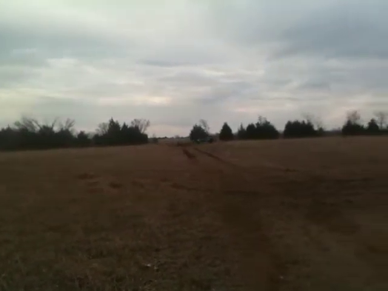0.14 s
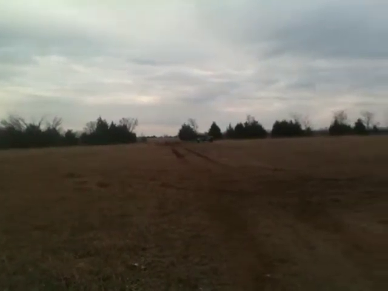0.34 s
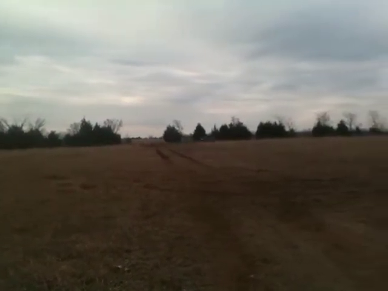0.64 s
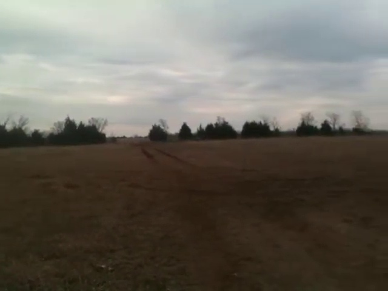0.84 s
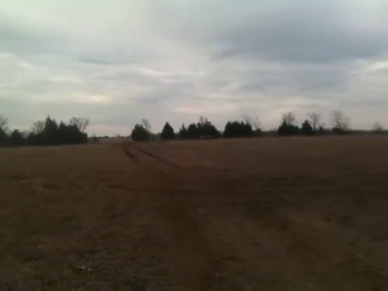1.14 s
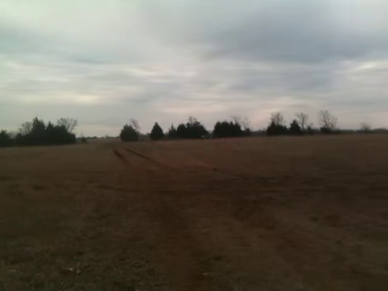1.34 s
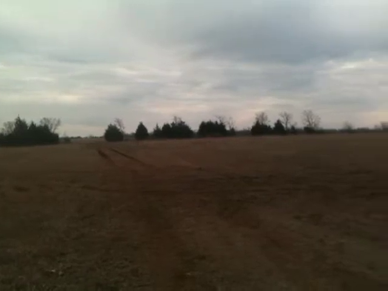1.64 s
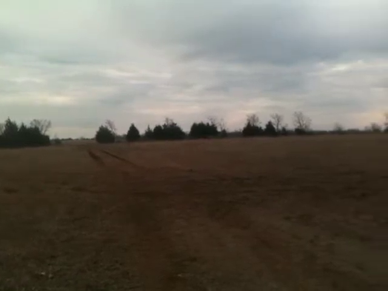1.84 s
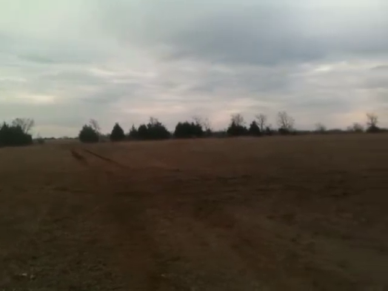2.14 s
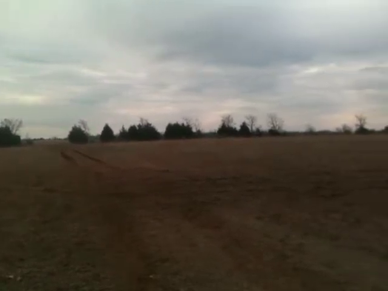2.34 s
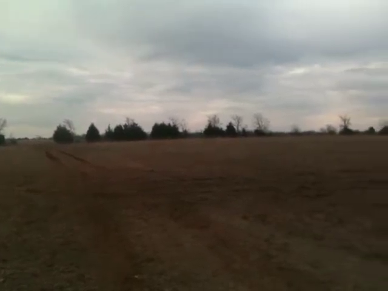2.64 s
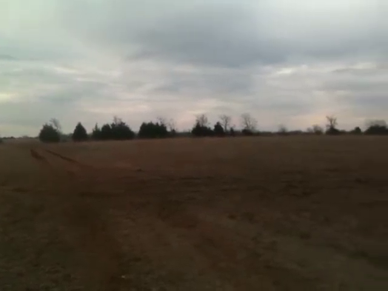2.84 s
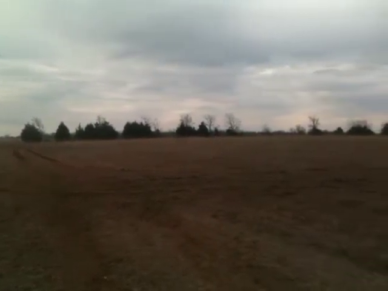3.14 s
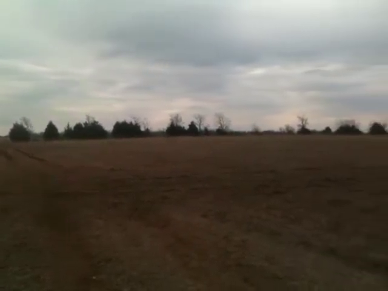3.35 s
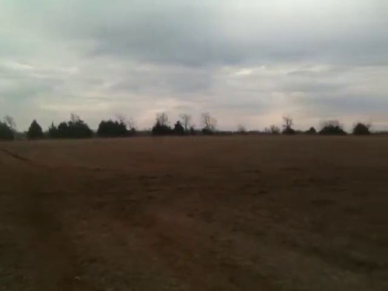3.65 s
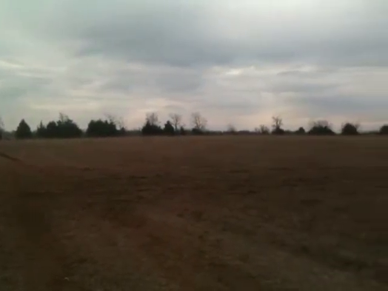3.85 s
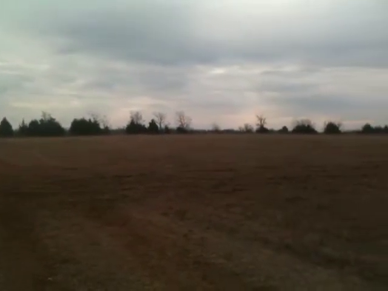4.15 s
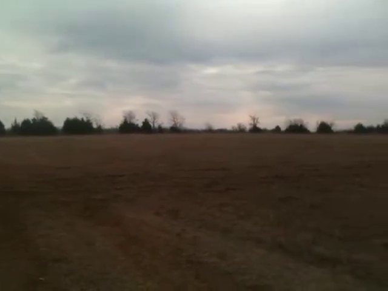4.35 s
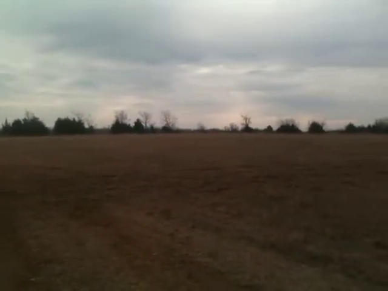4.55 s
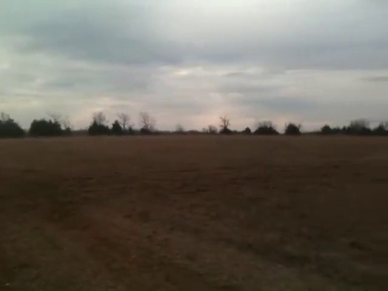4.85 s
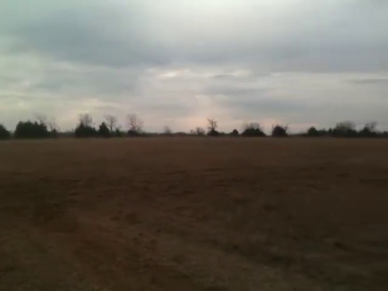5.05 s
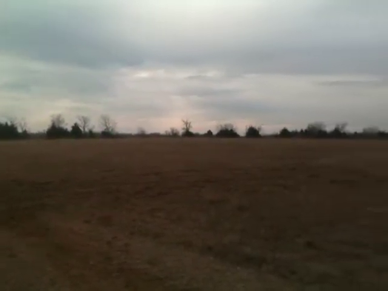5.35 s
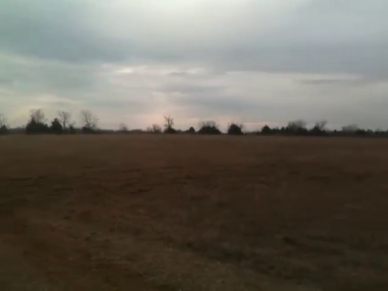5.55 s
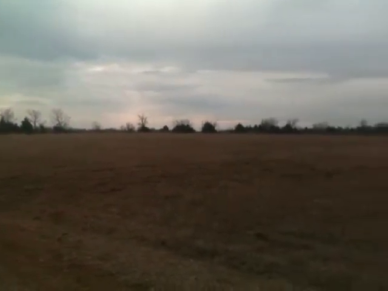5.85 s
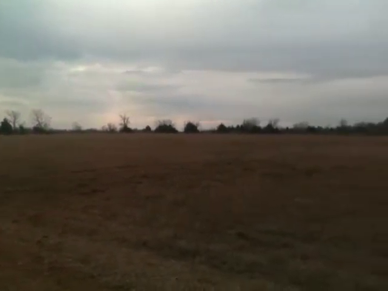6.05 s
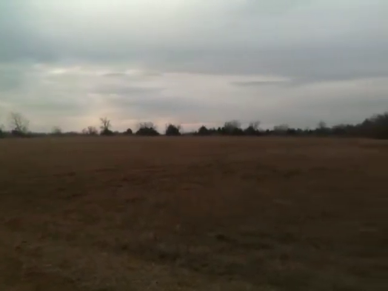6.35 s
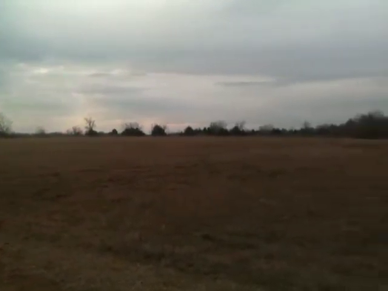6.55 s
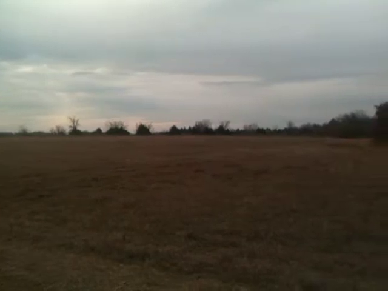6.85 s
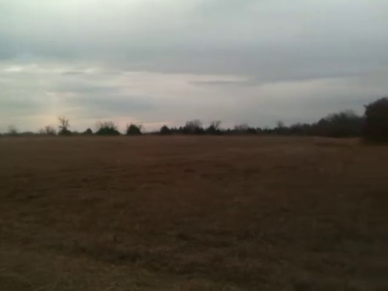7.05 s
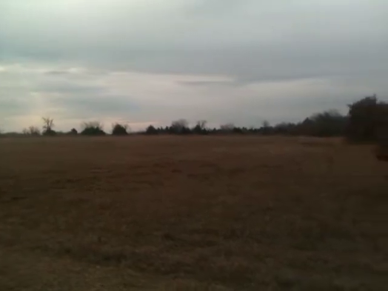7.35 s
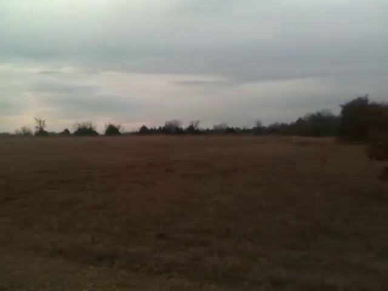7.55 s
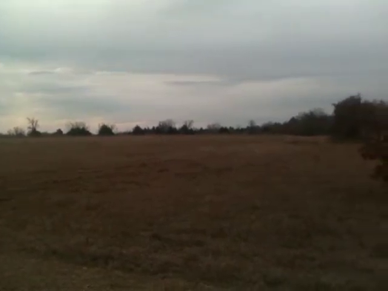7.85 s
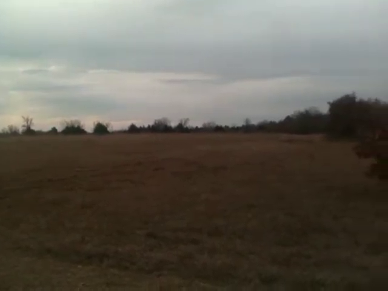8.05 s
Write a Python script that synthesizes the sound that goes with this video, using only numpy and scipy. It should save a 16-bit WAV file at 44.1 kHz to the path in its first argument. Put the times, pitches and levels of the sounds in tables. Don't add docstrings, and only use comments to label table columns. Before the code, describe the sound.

Far-off eight-cylinder engine howls, surging over ruts for nearly six seconds, before the throttle closes and exhaust crackles trail into quiet hiss.

```python
import sys
import numpy as np
from scipy import signal
from scipy.fft import rfft, irfft
from scipy.io import wavfile

SR = 44100
rng = np.random.default_rng(int(sys.argv[2]) if len(sys.argv) > 2 else 0)


def gain_from_decibels(decibels):
    exponent = np.asarray(decibels, float) / 20
    return 10 ** exponent


def wav_record(signal):
    frames = np.transpose(np.atleast_2d(signal))
    bounded = np.clip(frames, -1, 1)
    quanta = np.round(bounded * 32767).astype(np.int16)
    wavfile.write(sys.argv[1], SR, quanta)


N = 361603
TIME = np.arange(N) / SR
LIFT_S = 5.75
HEADINGS = np.linspace(0, 2, 4)

# start_s, turn (0 facing - 2 away), unevenness_between_cylinders_db
COURSE = [(0, -0.5, -0.5), (.3, -0.5, 4), (.62, 0.14, 1.5), (1.1, 0.67, -1.5), (2.45, 1.32, 3.5),
          (3.75, 1.23, -5), (4.4, 2.2, -.6), (5, 2, -6), (5.65, 2.5, .1), (5.9, 14, 5.5), (6.3, 4.5, 7),
          (6.6, 2, 6), (7, 1.8, -4.5), (7.5, 5, -12), (7.95, 2.5, -0.5), (8.2, 1.35, -10)]


def in_time(rows):
    s, *columns = np.transpose(rows)
    return [np.interp(TIME, s, column) for column in columns]


def flares(events):
    return sum(height * np.exp(-((TIME - s) / half_s) ** 2) for s, height, half_s in events)


def rms_one(x):
    return x / np.sqrt(np.mean(x ** 2) + 1e-20)


def drift(rate):
    r = np.exp(-80 * np.pi * rate / SR)
    noise = rng.standard_normal(N // 40 + 2002)
    slow = signal.lfilter([1], [1, -2 * r, r * r], noise)[2000:]
    return np.interp(np.arange(N) / 40, np.arange(len(slow)), rms_one(slow))


def frequencies():
    return np.maximum(np.arange(N // 2 + 1) * SR / N, 1)


def shaped(x, spectrum):
    hz, db = np.transpose(spectrum)
    gain_db = np.interp(np.log(frequencies()), np.log(hz), db, -90, -90)
    return rms_one(irfft(rfft(x) * gain_from_decibels(gain_db), N))


def filtered(x, steepness, hz, kind):
    return signal.sosfilt(signal.butter(steepness, hz, kind, fs=SR, output="sos"), x)


def speed():
    # start_s, four_stroke_cycles_hz
    cruise = [(0.0, 22.72), (0.4, 25.06), (1.35, 26.4), (2.1, 25.35), (2.8, 26.17), (4.3, 28.83),
              (4.7, 28.25), (5.75, 30.28), (6.08, 26.8), (6.33, 28.4), (6.75, 26.6), (7.1, 25.0),
              (7.5, 23.5), (8.2, 21.0)]
    # centre_s, rise_of_cycle_rate_hz, half_width_s
    ruts = [(0.157, 4.14, 0.13), (0.609, 5.7, 0.12), (0.872, 3.18, 0.11), (1.173, 4.83, 0.121),
            (1.462, 1.71, 0.039), (1.6, 2.76, 0.086), (1.908, 3.38, 0.091), (2.256, 1.73, 0.083),
            (2.652, 2.08, 0.082), (2.963, 4.06, 0.089), (3.261, 2.4, 0.073), (3.608, 2.6, 0.07),
            (3.931, 0.932, 0.1), (4.135, 1.4, 0.072), (4.54, 2.63, 0.12), (4.847, 2.05, 0.11),
            (5.067, 1.88, 0.11), (5.316, 1.41, 0.098), (5.6, 0.95, 0.068)]
    return in_time(cruise)[0] + flares(ruts)


def note_levels(cycle_hz, away):
    # start_s, level_db
    note = [(0, -29), (.5, -27.5), (1, -28), (2, -27), (3, -28.5), (3.5, -30.5), (4, -32), (4.7, -32.5),
            (5.2, -37), (5.7, -39.5), (5.95, -40.5), (6.2, -48.5), (6.5, -46.5), (7, -53), (7.4, -51.5),
            (7.8, -54), (8.2, -60)]
    # pitch_hz, gain_db
    pipe = [(125, -19.5), (135, -12), (145, -8.5), (156, -6), (200, -2.5), (215, -1.1), (230, -1),
            (250, -7)]
    bark = [-14, -13.5, -17.5, -23.5]
    note_db = in_time(note)[0]
    hz, db = np.transpose(pipe)
    off_pitch = (8 * cycle_hz - 250) / 16.8
    off_time = (TIME - 1.3) / 0.97
    null_db = 22.5 * np.exp(-off_pitch ** 2 - off_time ** 2)
    cut_db = 25 * np.clip(4 - 4 * abs(2 * (TIME - LIFT_S) / 0.332 - 1), 0, 1)
    drone_db = 19.5 * np.clip(TIME - 6.6, 0, 1)
    firing_db = note_db + np.interp(8 * cycle_hz, hz, db) - null_db - cut_db
    pipe_db = note_db + np.interp(5 * cycle_hz, hz, db) + drone_db
    bark_db = note_db + np.interp(away, HEADINGS, bark) - cut_db / 2
    return firing_db, pipe_db, bark_db


def order(angle, k, rough):
    clean = np.sqrt(1 - rough ** 2)
    wobble = clean + rough * (drift(14) + 1j * drift(14)) / np.sqrt(2)
    start = rng.uniform(0, 2 * np.pi)
    return np.sqrt(2) * np.real(wobble * np.exp(1j * (k * angle + start)))


def exhaust(angle, cycle_hz, away):
    # order, then level_db at the four headings
    order_levels = [(3, -67.5, -66, -64.5, -62.5), (4, -58, -60, -60.5, -61), (6, -55, -47.5, -56, -59),
                    (7, -45.0, -47, -48, -57.5), (9, -50, -53.5, -51.5, -62.5), (10, -50, -56.5, -58, -69),
                    (11, -52.5, -52.5, -56, -74.5), (12, -54, -53.5, -65.5, -81.5),
                    (13, -51.5, -54, -72.5, -70.0), (14, -60.5, -70, -81, -70.9),
                    (15, -53.5, -71.4, -69.5, -65.5), (16, -56.5, -74.5, -70.5, -71),
                    (17, -79, -83, -80.5, -79.5), (18, -58.5, -71.5, -83, -70.5),
                    (19, -60.5, -69, -78.6, -70.7), (20, -64.4, -76.5, -71, -70),
                    (21, -71, -74.5, -80, -68.5), (22, -75, -90.5, -76, -83.4),
                    (23, -68.5, -79, -74.5, -77), (24, -74, -74, -73.5, -73)]
    # start_s, roughness (0-1)
    misfire = [(0, .36), (1, .25), (3, .2), (4.5, .12), (6.1, .2), (6.5, .55), (8.2, .6)]
    # pitch_hz, level_db_per_hz
    rumble = [(18, -72), (30, -39), (75, -16), (100, -11.5), (135, 3.5), (189, 1), (223, 4.5), (276, -16.5),
              (402, -39.5), (600, -35), (780, -65.5), (1320, -120)]
    firing_db, pipe_db, bark_db = note_levels(cycle_hz, away)
    uneven_db = in_time(COURSE)[1]
    rough = in_time(misfire)[0]
    lifted = np.clip((TIME - LIFT_S) / .35, 0, 1)
    facing = np.exp(-(away / 0.16) ** 2)

    sub_db = -11 * lifted
    low_db = 1.3 + uneven_db
    high_db = -0.2 + 0.37 * uneven_db - 12 * lifted + 3.5 * facing
    rumble_db = -49 + 0.37 * uneven_db

    level = {round(k): gain_from_decibels(np.interp(away, HEADINGS, db)) for k, *db in order_levels}
    bark_now = np.sqrt(sum(level[k] ** 2 for k in range(9, 17)))
    out = gain_from_decibels(firing_db) * order(angle, 8, rough ** 2)
    out = out + gain_from_decibels(pipe_db) * order(angle, 5, rough ** 2)
    for k in level:
        if k < 5:
            group = gain_from_decibels(sub_db)
        elif k < 9:
            group = gain_from_decibels(low_db)
        elif k < 17:
            group = gain_from_decibels(bark_db) / bark_now
        else:
            group = gain_from_decibels(high_db)
        out += level[k] * group * order(angle, k, np.minimum(1.5 * rough, .95))

    lumps = rng.standard_normal(N) * gain_from_decibels(6 * rough * drift(25))
    growl = filtered(lumps * gain_from_decibels(2.0 * drift(4.2)), 3, [380, 740], "band")
    return out + gain_from_decibels(rumble_db) * shaped(lumps, rumble) + gain_from_decibels(-55.5) * facing * rms_one(growl)


def puffs(events, late_s, swings):
    out = np.zeros(N)
    t = np.arange(-2000, 2000) / SR
    for s, peak_db, hz in events:
        at = round((s + late_s) * SR)
        turns = t * hz
        shape = np.exp(-(turns / np.where(t < 0, 0.64 * swings, swings)) ** 2)
        swing = np.cos(2 * np.pi * (turns - 0.046 * turns ** 2) - .3)
        out[at - 2000:at + 2000] += gain_from_decibels(peak_db) * shape * swing
    return out


def pops():
    # start_s, peak_db, pitch_hz, crack_over_thud_db
    bangs = [(4.676, -25.5, 209.4, -26), (5.884, -39.5, 168.4, -11), (6.272, -32, 189.4, -19),
             (6.343, -34.5, 166, -13), (6.435, -18, 250, -10.5), (6.452, -27, 173.8, -12),
             (6.524, -30, 189.3, -20), (6.606, -27.5, 245.6, -11), (6.665, -35, 291, -18),
             (6.674, -42, 196.4, -9), (6.698, -36, 171, -5), (6.759, -36, 163.6, -10),
             (6.929, -36.5, 183, -9), (7.014, -34.5, 162, -14), (7.07, -42, 189, -24),
             (7.257, -35.5, 186.8, -27), (7.375, -44, 184, -26), (7.596, -39, 208, -18),
             (7.738, -32, 189, -11), (7.857, -36.5, 186, -21), (7.897, -41, 208, -18),
             (7.926, -33, 176.5, -14), (7.955, -33, 216, -16), (7.974, -31.5, 170.6, -18),
             (7.999, -36, 205, -16), (8.066, -42, 164.7, -17)]
    thuds = [(s, peak_db, hz) for s, peak_db, hz, crack_db in bangs]
    cracks = [(s, peak_db + crack_db, 350) for s, peak_db, hz, crack_db in bangs]
    return puffs(thuds, 0.00587, swings=1.18) + puffs(cracks, 0.00588, swings=0.81)


def patchy(x, patchy_db, rate):
    together = drift(rate / 2)
    centres = np.log(400 * 2 ** np.arange(0, 5.1, 1 / 5))
    grid = np.log(frequencies())
    spectrum = rfft(x)
    out = np.zeros(N)
    for k in range(len(centres)):
        weight = np.interp(grid, centres, np.arange(len(centres)) == k)
        flicker_db = patchy_db * (0.2 * together + drift(rate))
        out += irfft(spectrum * weight, N) * gain_from_decibels(flicker_db)
    return out


def roar(angle, away):
    # start_s, level_db, brightness_db
    strength = [(0, -49.5, -6), (1.5, -47, -17.5), (3, -48.5, -14.5), (4.5, -47, -17.5),
                (4.95, -47.5, -20.5), (5.6, -50.5, -18), (5.85, -52, -20.5), (6.05, -54.5, -14.5),
                (6.28, -53.5, -23.5), (6.5, -56, -20), (6.8, -56.5, -23.5), (7.4, -61.5, -15),
                (8.2, -65, -25)]
    # pitch_hz, level_db_per_hz
    near = [(260, -28), (430, -22), (510, -15.5), (560, -5), (783, -15), (951, -5), (1300, -9),
            (1590, -4.5), (1790, -4.5), (2140, 1.5), (2900, -12.5), (3770, -59), (6380, -120)]
    # pitch_hz, level_db_per_hz
    turned = [(260, -34.5), (385, -26.5), (450, -6), (514, -14.5), (569, -3.5), (807, -10), (922, -2.5),
              (1080, 1.5), (1160, -4), (1280, -3.5), (1380, 4), (1440, -2), (1580, 0), (1760, -7),
              (2120, -4.5), (2900, -18.5), (3770, -53.5), (6380, -120)]
    # pitch_hz, level_db_per_hz
    upper = [(1710, -15.5), (2900, -8), (3020, -3), (3630, 1.5), (4100, -1), (5160, -2), (6170, -6),
             (6880, -15.5), (9180, -11.5), (10900, -28.5), (11500, -25), (15000, -64), (22000, -120)]
    # centre_s, mid_swell_db, treble_swell_db, half_width_s
    gust_rows = [(0.34, -2.2, -2, 0.11), (0.66, 0.8, 1.5, 0.075), (0.97, -4.5, -2.5, 0.13),
                 (1.45, 0, 3.7, 0.21), (1.75, -0.5, 4, 0.07), (1.86, 1.3, 3.7, 0.073), (2.14, -3, -2, 0.1),
                 (2.28, 0, 0.5, 0.062), (2.43, -3.5, -4.5, 0.09), (2.53, -1.5, 3.5, 0.045),
                 (2.76, -1.7, -2.2, 0.14), (3.14, 1.6, 2.5, 0.091), (3.59, 3, 3.5, 0.15),
                 (3.83, -3, -3, 0.091), (4.05, 0.5, -0.2, 0.06), (4.27, -0.8, -1.5, 0.1),
                 (4.5, 0.8, 1, 0.096), (4.75, -2.5, -1, 0.12), (4.92, 0.5, -2.5, 0.079),
                 (5.14, -6, -3.5, 0.17), (5.61, 1.5, 0, 0.094), (5.86, -2.5, -4.34, 0.11),
                 (6.21, 6, 4.5, 0.12), (6.9, 1.8, 1.62, 0.14), (7.55, -1.31, -3, 0.089),
                 (7.96, 6.5, 4, 0.13)]
    level_db, bright_db = in_time(strength)
    gusts = np.array(gust_rows)
    mid_db = flares(gusts[:, [0, 1, 3]])
    treble_db = flares(gusts[:, [0, 2, 3]])

    gate = gain_from_decibels(1.2 * np.cos(angle) + 1.2 * np.cos(8 * angle))
    pattern = rng.standard_normal(257)
    rasp = np.interp(angle / (2 * np.pi) % 1 * 256, np.arange(257), pattern)
    rasp = filtered(rasp, 2, [850, 1700], "band") * (TIME < LIFT_S)
    source = gate * rng.standard_normal(N) + .75 * rasp

    dull = (away / 2) ** 1.7
    low = (1 - dull) * shaped(source, near) + dull * shaped(source, turned)
    high = shaped(np.sqrt(gate) * rng.standard_normal(N), upper)
    both = gain_from_decibels(mid_db) * low + gain_from_decibels(bright_db + treble_db) * high
    return gain_from_decibels(level_db) * patchy(both, patchy_db=1.6, rate=5.9)


def wind():
    # start_s, peak_db, pitch_hz
    buffets = [
        (1.08, -43, 116.4),
        (1.948, -37.5, 117),
        (2.295, -36, 118.4),
        (5.313, -52, 87.2),
        (6.138, -66, 86.1),
        (6.419, -41, 102),
        (6.661, -38, 116.5),
        (6.745, -43, 92),
        (6.898, -46, 119.3),
        (7.381, -54, 118),
    ]
    return puffs(buffets, 0.0191, swings=1.5)


def microphone():
    # pitch_hz, level_db_per_hz
    hiss = [(180, -33), (300, -4.5), (378, -14), (601, -9), (782, -13.5), (1020, 1), (1200, -12.5),
            (2040, -21), (2890, -26), (15600, -30)]
    # pitch_hz, level_db (rms)
    whine_tones = [(14910, -100), (14970, -92), (15030, -91), (15090, -99)]
    # start_s, peak_db
    taps = [
        (.0204, -49.5),
        (.412, -43.5),
        (.979, -55),
        (2.6382, -54),
        (3.4125, -48),
        (5.559, -51),
    ]
    clicks = np.zeros(N)
    for s, peak_db in taps:
        clicks[round((s + .001) * SR)] = gain_from_decibels(peak_db + 9)
    ticks = filtered(clicks + 1e-18, 2, 9000, "high")
    whine = sum(np.sqrt(2) * gain_from_decibels(db) * np.sin(2 * np.pi * hz * TIME) for hz, db in whine_tones)
    return gain_from_decibels(-66.5) * shaped(rng.standard_normal(N), hiss) + whine + ticks


def scene():
    cycle_hz = speed()
    angle = 2 * np.pi * np.cumsum(cycle_hz) / SR
    away = np.clip(in_time(COURSE)[0], 0, 2)
    truck = exhaust(angle, cycle_hz, away) + pops() + roar(angle, away)
    return (truck + wind() + microphone())[None]


def top_cut(x):
    return signal.sosfilt(signal.butter(12, 15760, fs=SR, output="sos"), x)


def record(dry):
    return top_cut(dry)


dry = scene()
out = record(dry)
wav_record(out)
```